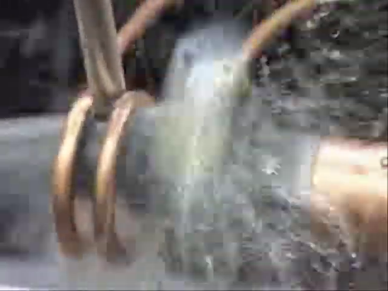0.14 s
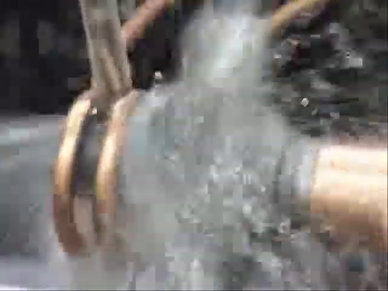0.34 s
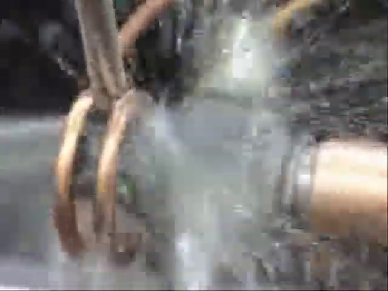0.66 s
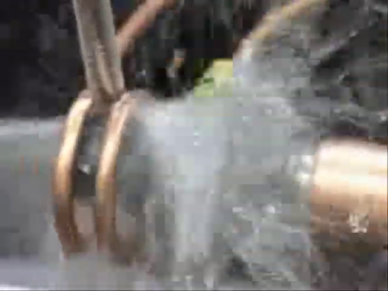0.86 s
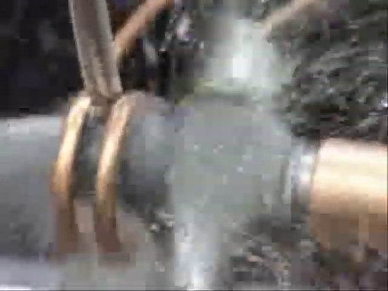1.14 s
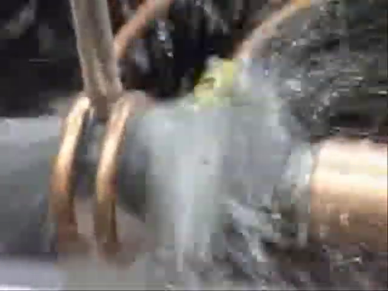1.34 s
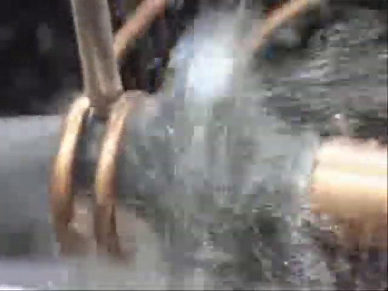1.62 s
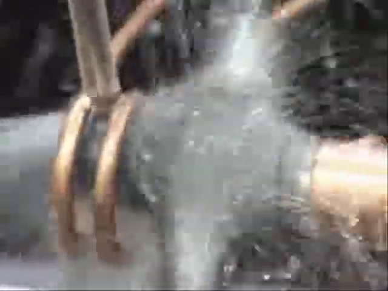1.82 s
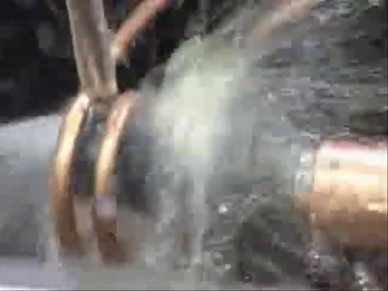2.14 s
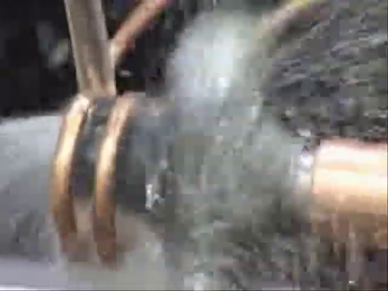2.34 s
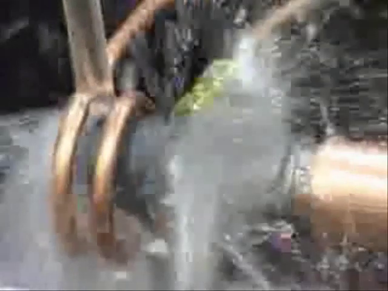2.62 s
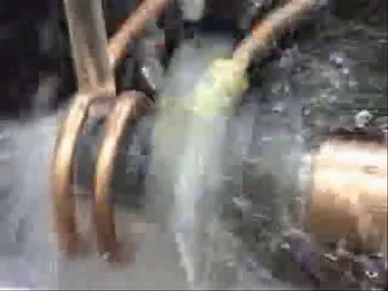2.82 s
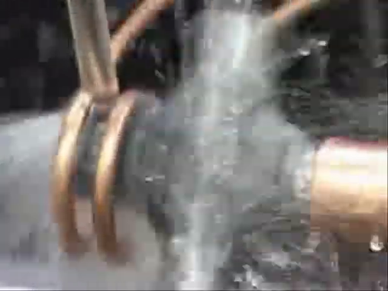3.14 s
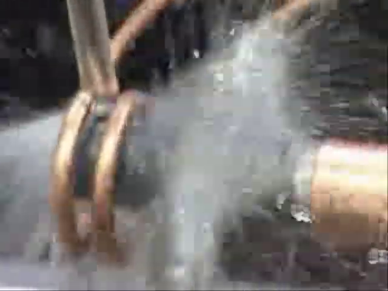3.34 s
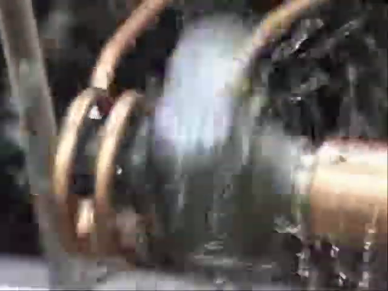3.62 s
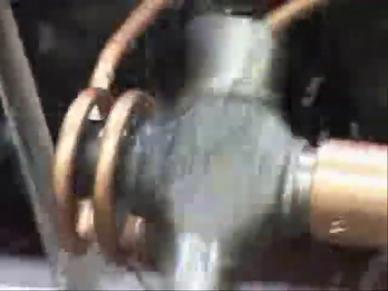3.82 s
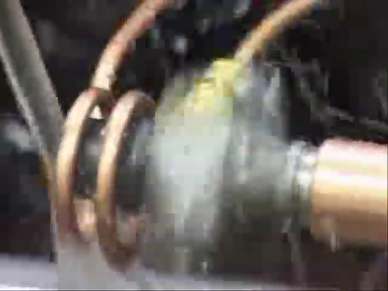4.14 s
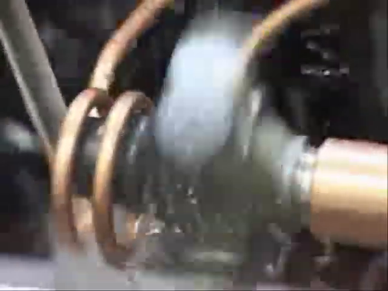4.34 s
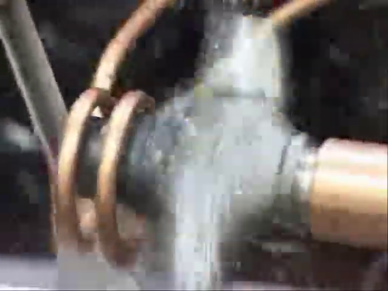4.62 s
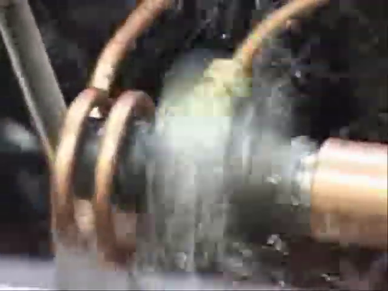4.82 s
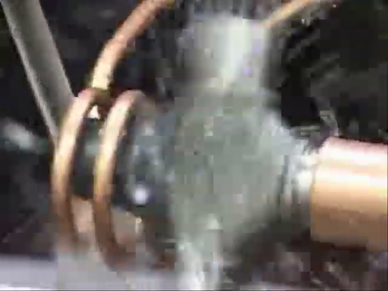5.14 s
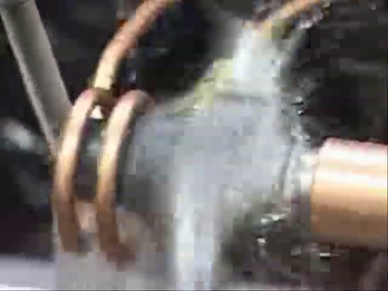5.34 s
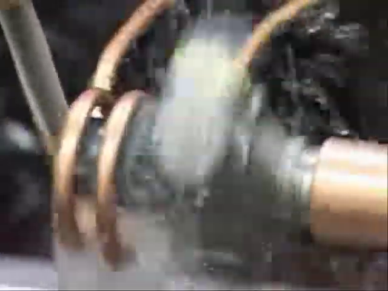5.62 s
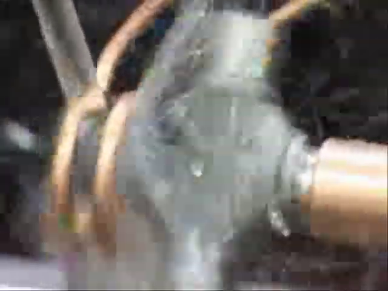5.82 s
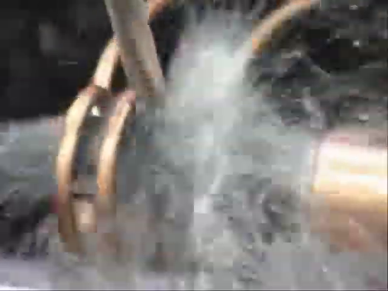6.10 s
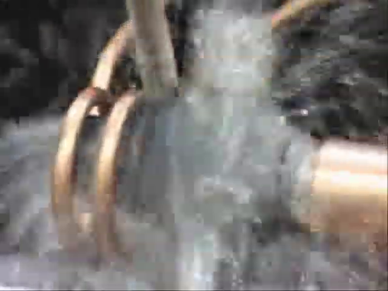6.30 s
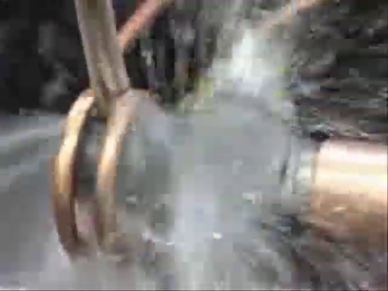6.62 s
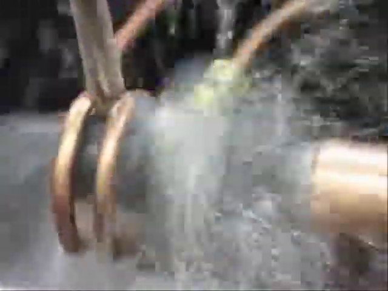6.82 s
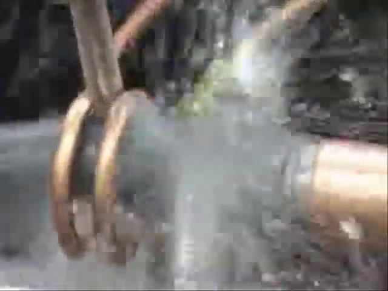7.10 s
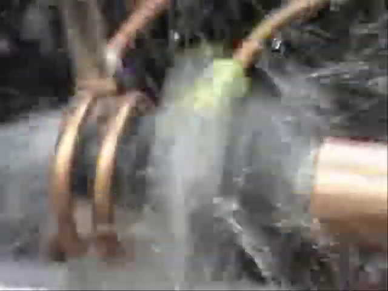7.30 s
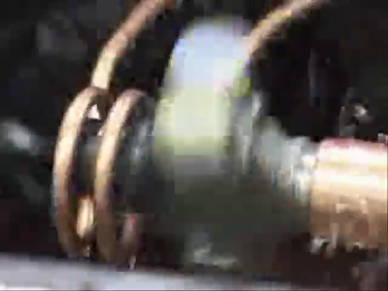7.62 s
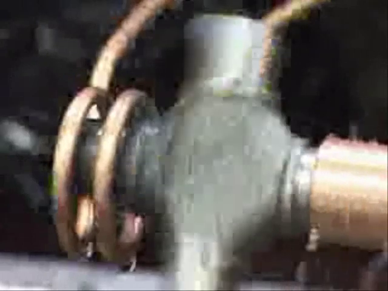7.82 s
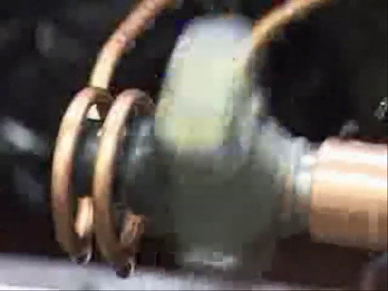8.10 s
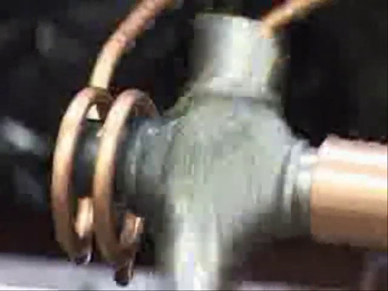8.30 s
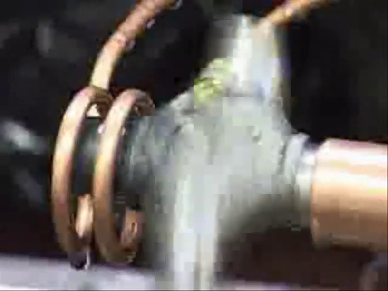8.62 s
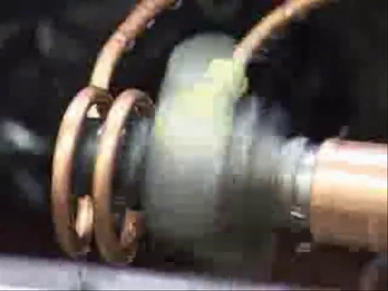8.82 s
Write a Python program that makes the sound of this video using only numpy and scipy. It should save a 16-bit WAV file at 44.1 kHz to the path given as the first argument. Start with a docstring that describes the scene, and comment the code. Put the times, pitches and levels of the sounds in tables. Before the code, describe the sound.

Loud quench water sprays onto a hot turning metal part in a workshop for about 9 seconds without a break. The spray is a bright, fluttering, grainy hiss; below it, run-off rumbles, splashes and gurgles with tiny bubble rings around 1 kHz. A motor-driven pump and gear whine steadily on many locked pitches. The high whine near 4 kHz dips at about 0.7 s, returns, grows from about 4 s and is strongest around 5.4 s, then eases slightly; pitch edges up overall. Brief soft hollow tones surface in the splash, mostly at 0.8-2.3, 3.8-4.6 and 7.7-8.7 s. Dull low thuds fall near 4.0, 7.9, 8.0 and 8.4 s. Water swells slightly at 7.8 s. Mains hum and fans drone throughout. One microphone, mono, with close wall reflections and coarse, mirrored treble.

```python
"""In a noisy workshop, quench water sprays onto a hot part in an induction coil and gurgles away below.
The water is shaped noise with grains of droplet impacts and ringing bubbles, and brief decaying sines sound
within its splash. Through the hiss whine sines locked to one motor shaft, which drives a seven-piston pump
and an eighteen-tooth gear. Mains hum and fans drone below as steady-pitched sines; four dull thuds are
decaying low sines. One microphone feeds a mono recorder that samples at half rate and repeats every sample."""
import sys
import numpy as np
from scipy import signal
from scipy.fft import rfft, irfft
from scipy.io import wavfile

SR = 44100
rng = np.random.default_rng(int(sys.argv[2]) if len(sys.argv) > 2 else 0)


def wrap_up_sound(samples):
    """Save the sound to the file named by the first command line argument, as 16-bit audio."""
    columns = np.atleast_2d(samples).T
    # keep every value between -1 and 1, then stretch to whole-number steps
    tamed = np.clip(columns, -1, 1)
    steps = np.round(tamed * 32767).astype(np.int16)
    wavfile.write(sys.argv[1], SR, steps)


N = 395136

# Speed of the motor shaft. Each row: time in seconds, speed in rpm.
SHAFT_SPEED = [(0, 2823), (.5, 2822.5), (1.1, 2820), (1.8, 2821.5), (2.3, 2819), (3.5, 2820.4),
               (4.3, 2824.6), (5.3, 2828.2), (6.1, 2827.8), (6.7, 2825.4), (7.6, 2828), (8.05, 2833.8),
               (8.6, 2835.4), (8.96, 2835)]
USUAL_RPM = 2825


def amp(db):
    """Decibels to gain."""
    return 10 ** (np.asarray(db) / 20)


def rms_one(x):
    """Scale to unit rms."""
    return x / np.sqrt(np.mean(x ** 2) + 1e-20)


def in_time(rows):
    """Columns of a table after its times, joined by straight lines at every sample."""
    s, *columns = np.transpose(rows)
    return [np.interp(np.arange(N) / SR, s, c) for c in columns]


def drift(corner_hz):
    """Random wander of spread 1: noise through a double one-pole low-pass, run at every 40th sample."""
    r = np.exp(-2 * np.pi * corner_hz * 40 / SR)
    noise = rng.standard_normal(N // 40 + 3002)
    slow = signal.lfilter([1], [1, -2 * r, r * r], noise)[3000:]  # skip the filter's start
    return np.interp(np.arange(N) / 40, np.arange(len(slow)), rms_one(slow - slow.mean()))


def colour(x, spectrum):
    """Shape noise by a spectrum and by the resonances of hollow parts; rms 1."""
    # Hollow parts of the tank and guards.
    # Each row: centre in Hz, width at half the boost in Hz, boost in dB (a dip if negative).
    hollows = [(960, 23, 3.5), (1163, 38, 6.5), (1290, 49, 5.5), (1386, 30, -3.5), (2790, 82, 4),
               (4460, 50, 3)]
    hz = np.arange(N // 2 + 1) * SR / N + 1e-3
    at_hz, level_db = np.transpose(spectrum)
    shape_db = np.interp(np.log(hz), np.log(at_hz), level_db, left=-80, right=-80)
    for centre_hz, width_hz, boost_db in hollows:
        shape_db += boost_db / (1 + (2 * (hz - centre_hz) / width_hz) ** 2)
    return rms_one(irfft(rfft(x) * amp(shape_db), N))


def tone(cycles, level_db, waver_db, corner_hz):
    """A sine, level in dB rms, that wavers as the room paths to the microphone shift."""
    height = np.sqrt(2) * amp(level_db + waver_db * drift(corner_hz))
    return height * np.sin(2 * np.pi * (cycles + rng.random()))


def swells(events, rise_s):
    """Sines that rise softly and die; each event: start s, decay's starting level dB, pitch Hz, t60 s."""
    out = np.zeros(N)
    for start_s, level_db, hz, t60 in events:
        t = np.maximum(np.arange(N) / SR - start_s, 0)
        decay = amp(level_db - 60 * t / t60)
        out += decay * (1 - np.exp(-t / rise_s)) * np.sin(2 * np.pi * hz * t)
    return out


def water():
    """Shaped noise: rumble and splash follow the run-off, hiss and treble the fluttering spray jet."""
    # Strength of the spray and of the run-off that splashes below; only the swing about the mean counts.
    # Each row: time in seconds, spray in dB, run-off in dB.
    flow = [(0, -21, -23.5), (.8, -20, -22.5), (1.6, -20.5, -22), (2.4, -20, -22.5), (3.2, -20, -22.5),
            (4.0, -19.5, -21), (4.6, -19.5, -22.2), (5.4, -19.5, -21), (6.2, -19.5, -21.2),
            (6.8, -19.5, -22), (7.2, -19.5, -20.5), (7.5, -19.5, -22), (7.8, -18.5, -19), (8.1, -20, -21.3),
            (8.5, -19.5, -21.5), (8.96, -20, -22.5)]
    # Spectra of the four layers, low to high. Each row: frequency in Hz, relative level in dB.
    rumble_spectrum = [(12, -14), (28, -13), (45, -16), (70, -3), (100, -6.5), (135, 0.5), (200, -4.5),
                       (350, 0), (520, -3), (700, -14), (1000, -44)]
    splash_spectrum = [(450, -31), (620, -6), (800, -3), (950, -2), (1150, -1.5), (1350, -2), (1450, -4),
                       (1800, -5.5), (2050, -11.5), (2600, -13)]
    hiss_spectrum = [(1500, -12.5), (2050, -6.5), (2700, -2.5), (3120, -4), (3700, 0.5), (4120, -2),
                     (4400, 0.5), (5050, 0), (5400, -2.5), (6100, -6), (7000, -51)]
    treble_spectrum = [(5400, -16), (6300, 0), (6680, -2), (6950, 0), (7650, -1.5), (8100, -1), (8480, 2),
                       (8800, -1), (9200, -3), (9600, -6), (10000, -8), (10220, -10), (10350, -18),
                       (10600, -30)]

    spray_db, runoff_db = [db - db.mean() for db in in_time(flow)]
    faster_rpm = in_time(SHAFT_SPEED)[0] - USUAL_RPM
    noise = rng.standard_normal((4, N))
    flutter = drift(20.0)

    # each level: base in dB, share of the stream's swing, then random wander in dB
    rumble_db = -32 + runoff_db + 0.07 * faster_rpm + 0.6 * drift(2.4)
    rumble = amp(rumble_db) * colour(noise[0], rumble_spectrum)

    splash_db = -22 + 0.83 * runoff_db + 0.38 * drift(7.4)
    bubbles = amp(-11.5) * gurgle(per_s=90, cycles=44.0)
    splash = amp(splash_db) * (colour(noise[1], splash_spectrum) + bubbles)

    hiss_db = -20.5 + 0.99 * spray_db + 0.43 * flutter
    grainy = noise[2] + 0.33 * droplets(per_s=3000, spread_db=3.1)
    # a faster pump brightens the hiss
    bright = brighten(colour(grainy, hiss_spectrum), gain_db=0.0653 * faster_rpm)
    hiss = amp(hiss_db) * bright

    treble_db = -25 + 0.98 * spray_db + 0.36 * flutter + 0.23 * drift(30.0)
    fine = noise[3] + 0.47 * droplets(per_s=2500, spread_db=2.7)
    treble = amp(treble_db) * colour(fine, treble_spectrum)
    return rumble + splash + hiss + treble


def droplets(per_s, spread_db):
    """Droplet impacts at random moments, of uneven size and random sign; rms 1."""
    sizes = amp(spread_db * np.minimum(rng.exponential(1, N), 5)) * rng.choice([-1, 1], N)
    return rms_one(sizes * (rng.random(N) < per_s / SR))


def brighten(x, gain_db):
    """Lift what lies above a corner frequency."""
    low = signal.sosfiltfilt(signal.butter(4, 4800, fs=SR, output="sos"), x)
    return low + amp(gain_db) * (x - low)


def ring(clicks, hz, t60):
    """A two-pole resonance: a unit click sets a sine of height 1 ringing."""
    r, w = amp(-60 / (t60 * SR)), 2 * np.pi * hz / SR
    return signal.lfilter([0, np.sin(w)], [1, -2 * r * np.cos(w), r * r], clicks + 1e-18)


def gurgle(per_s, cycles):
    """Bubbles trapped in the drain water ring at pitches around 1 kHz; rms 1."""
    pitches_hz = np.geomspace(880, 1420, num=12)
    hits = droplets(per_s, spread_db=3.3)
    dealt = rng.integers(0, len(pitches_hz), N)  # which pitch each hit excites
    total = np.zeros(N)
    for k, hz in enumerate(pitches_hz):
        t60 = cycles / hz
        once = ring(hits * (dealt == k), hz, t60)
        total += ring(once, hz, t60)  # ringing twice softens the onset
    return rms_one(total)


def brief_tones():
    """Brief, softly rising tones around 700 to 1300 Hz within the splash, each a decaying sine."""
    # Each row: start in seconds, starting level of the decay in dB, pitch in Hz.
    tone_events = [(.77, -29, 1160), (1.03, -23, 1166), (1.51, -16, 1125), (1.62, -24, 1170),
                   (1.86, -22, 1290), (2.04, -25, 1200), (2.27, -25, 1180), (3.81, -25, 1290),
                   (4.08, -17, 1210), (4.15, -22, 1290), (4.31, -23, 710), (4.55, -16, 990),
                   (7.69, -17, 1006), (7.74, -30, 1290), (7.8, -23, 960), (8.7, -14, 1166)]
    t60_s = 0.26
    return swells([(*row, t60_s) for row in tone_events], rise_s=0.012)


def echoes(x, level_db):
    """Reflections from nearby machine walls leave a fine ripple in the spectrum; power is roughly kept."""
    lags = (rng.uniform(0.004, 0.04, size=12) * SR).astype(int)
    wet = sum(np.roll(x, lag) * (-1) ** k for k, lag in enumerate(lags)) / np.sqrt(len(lags))
    return (x + amp(level_db) * wet) / np.sqrt(1 + amp(2 * level_db))


def drive():
    """Pump and gear lines, sines at fixed multiples of the turns of one shaft."""
    # Loud lines: piston rate, gear mesh, second mesh. Each entry: multiple of shaft speed.
    loud_orders = [7, 18, 36]
    # Levels of those lines. Each row: level in dB rms at the usual speed, dB gained per rpm above it,
    # share of the whine's swing (against it if negative).
    loud_levels = [(-30.5, 0.28, -0.16), (-28, 0.13, 0.076), (-25.5, -0.03, 0.26)]
    # The high whine. Each row: time in seconds, level in dB rms.
    whine_level = [(0, -30), (.35, -29.5), (.65, -36), (1.0, -32), (1.3, -29), (1.9, -29.5), (2.6, -28.5),
                   (3.3, -27.5), (3.84, -28.5), (4.2, -25.5), (4.5, -25), (5.4, -21.5), (6.1, -23),
                   (6.7, -25), (8.0, -24), (8.4, -25), (8.96, -26)]
    # Weaker piston lines. Each row: multiple of the piston rate, level in dB rms.
    piston_lines = [(2, -40), (3, -42), (5, -43), (7, -38), (8, -45), (9, -50), (10, -40), (14, -47),
                    (15, -44), (16, -49), (17, -45), (18, -49), (19, -45), (20, -50), (21, -44), (22, -49),
                    (23, -49), (24, -44), (25, -51), (26, -52), (27, -52), (28, -51), (29, -51)]
    # Other lines of the drive. Each row: multiple of shaft speed, level in dB rms.
    side_lines = [(19.6, -42), (29.4, -39), (32, -35), (39.2, -47), (46, -50), (50, -44), (54, -42),
                  (68, -45), (72, -43), (81.44, -42), (86, -48), (100, -47), (104, -43), (108, -43),
                  (123, -48), (179, -50), (180, -46), (193, -51)]

    rpm, = in_time(SHAFT_SPEED)
    whine_db, = in_time(whine_level)
    whine_swing_db = whine_db - whine_db.mean()
    turns = np.cumsum(rpm / 60) / SR
    piston_strokes = loud_orders[0] * turns

    loud = np.zeros(N)
    for order, (usual_db, db_per_rpm, share) in zip(loud_orders, loud_levels):
        level_db = usual_db + db_per_rpm * (rpm - USUAL_RPM) + share * whine_swing_db
        loud += tone(order * turns, level_db, waver_db=0.98, corner_hz=7.1)
    # twelfth piston line
    whine = tone(84 * turns, whine_db, waver_db=0.5, corner_hz=8.0)
    pistons = sum(tone(k * piston_strokes, db, waver_db=1.5, corner_hz=0.6) for k, db in piston_lines)
    sides = sum(tone(k * turns, db, waver_db=1.8, corner_hz=1.1) for k, db in side_lines)
    return loud + whine + pistons + sides


def hum():
    """Transformer hum on 60 Hz mains, and slow fans: sines of steady pitch and slightly wavering level."""
    # Each row: frequency in Hz, level in dB rms.
    hum_lines = [(41, -39.5), (58.5, -41.5), (85.5, -53), (120, -38.5), (180.2, -46), (240.2, -40),
                 (300.1, -40.5), (360, -45.5), (449.5, -51), (540.3, -47), (600.2, -67), (638.6, -42.5)]
    seconds = np.arange(N) / SR
    return sum(tone(hz * seconds, db, waver_db=0.7, corner_hz=2.5) for hz, db in hum_lines)


def thuds():
    """Dull thuds somewhere in the shop: decaying low sines with a slow onset."""
    # Each row: start in seconds, starting level of the decay in dB, pitch in Hz, t60 in seconds.
    thud_events = [(3.96, -20, 136, .25), (7.86, -30, 170, .25), (8.0, -28, 280, .2), (8.371, -20, 82, .3)]
    return swells(thud_events, rise_s=0.017)


def scene():
    """Everything reaches one microphone, copied to two equal channels."""
    mono = echoes(water(), level_db=-15.5) + brief_tones() + drive() + hum() + thuds()
    return np.tile(mono, (2, 1))


def record(dry):
    """Low-pass, then hold every second sample, which mirrors treble about SR / 4; cut the top."""
    anti_alias_hz, cutoff_hz = 10440, 15260
    smooth = signal.sosfilt(signal.ellip(14, 0.5, 90, anti_alias_hz, fs=SR, output="sos"), dry)
    held = np.repeat(smooth[:, ::2], 2, axis=1)[:, :N]
    return signal.sosfilt(signal.ellip(14, 0.5, 90, cutoff_hz, fs=SR, output="sos"), held)


dry = scene()
out = record(dry)
wrap_up_sound(out)
```